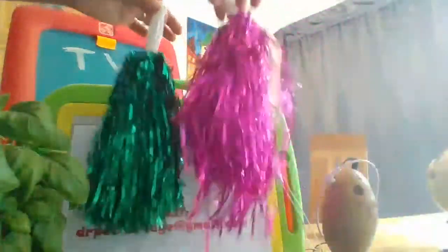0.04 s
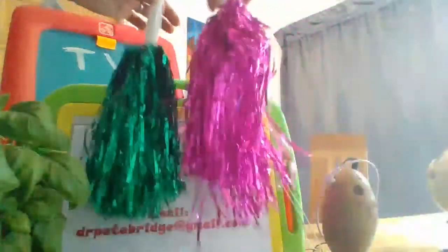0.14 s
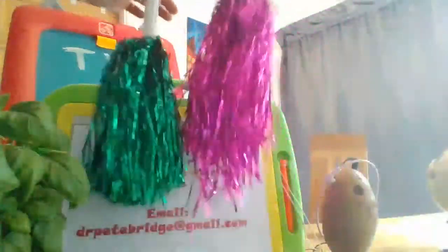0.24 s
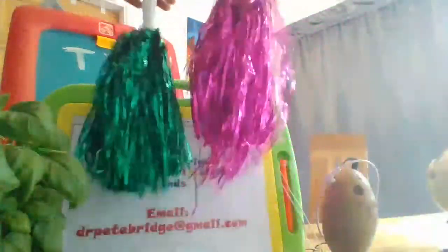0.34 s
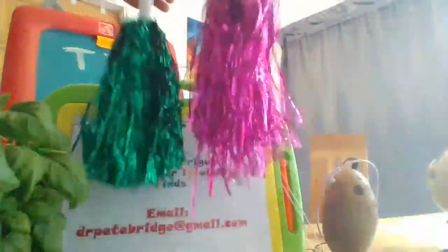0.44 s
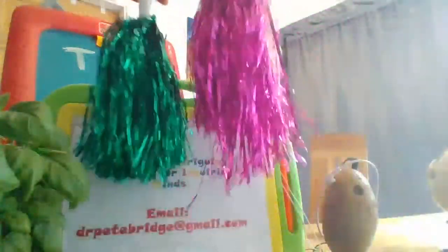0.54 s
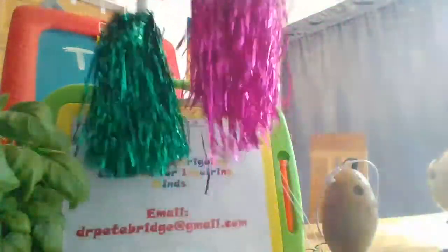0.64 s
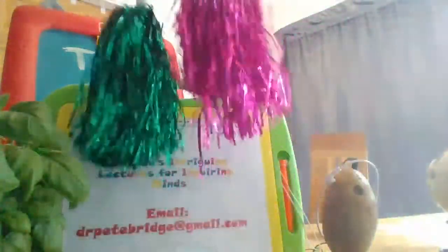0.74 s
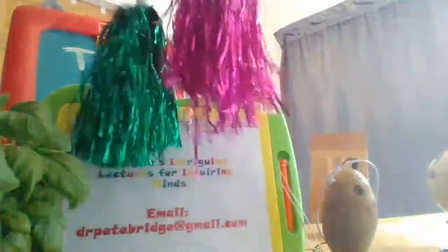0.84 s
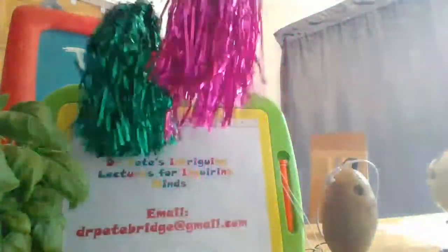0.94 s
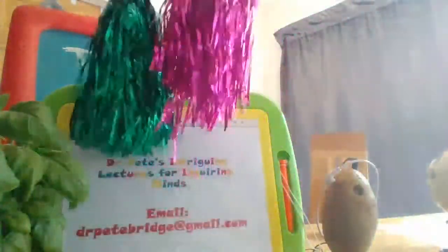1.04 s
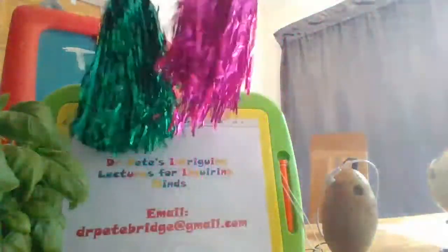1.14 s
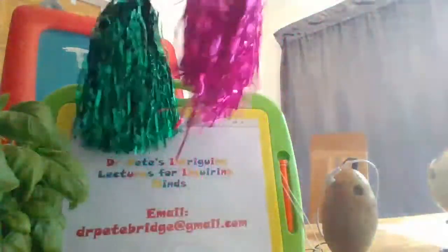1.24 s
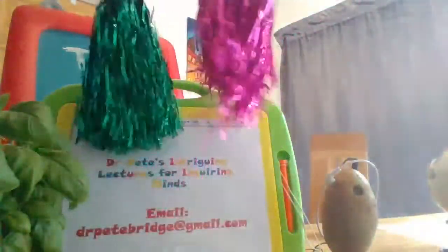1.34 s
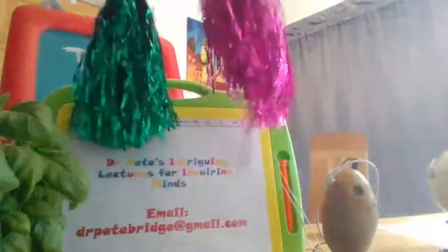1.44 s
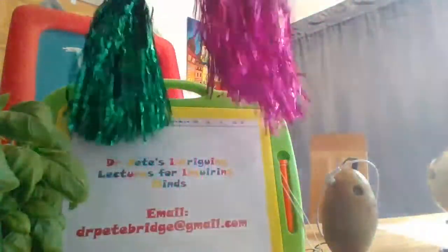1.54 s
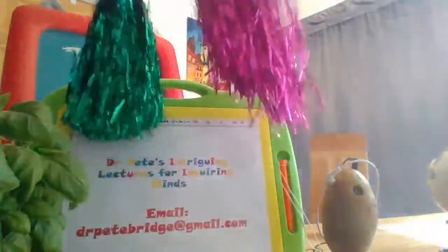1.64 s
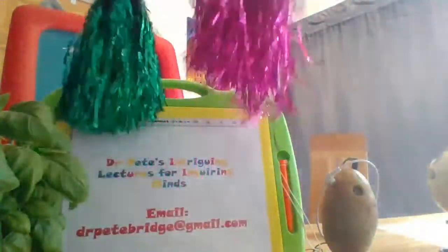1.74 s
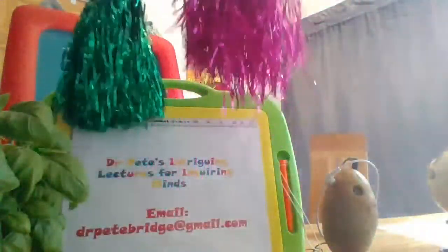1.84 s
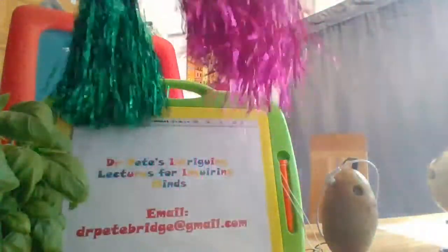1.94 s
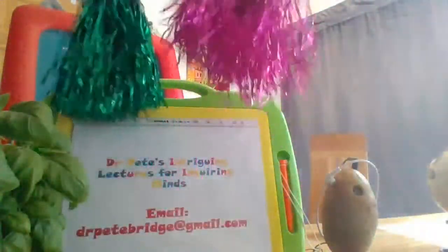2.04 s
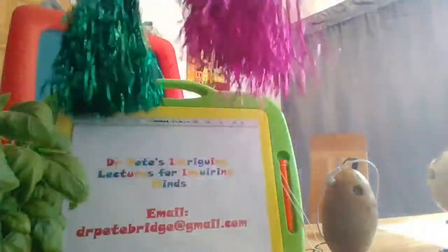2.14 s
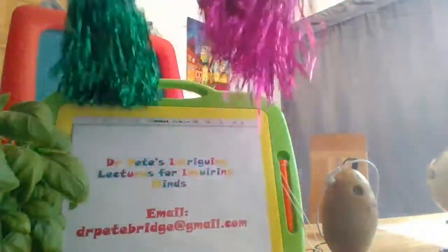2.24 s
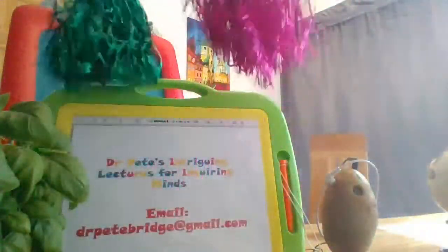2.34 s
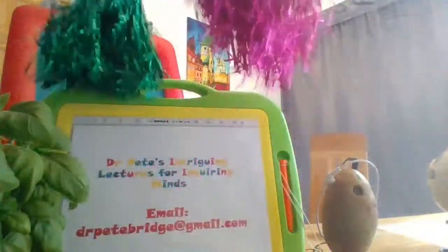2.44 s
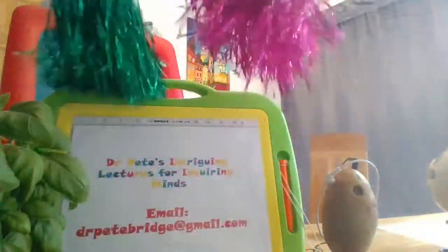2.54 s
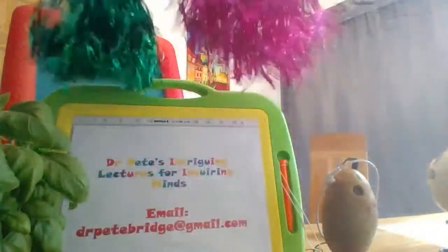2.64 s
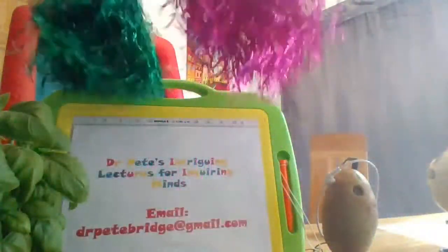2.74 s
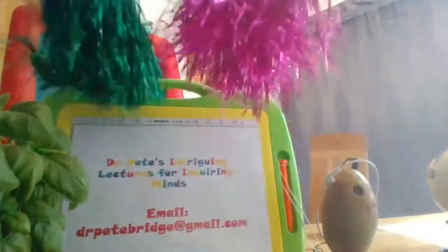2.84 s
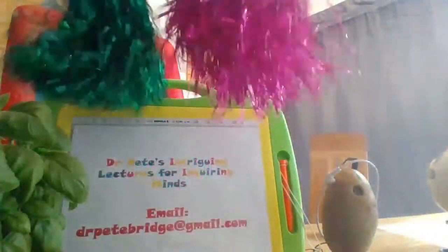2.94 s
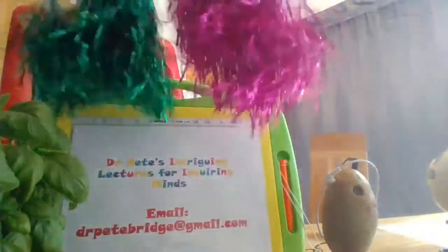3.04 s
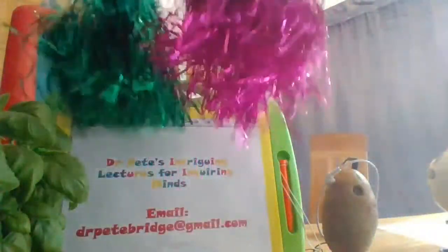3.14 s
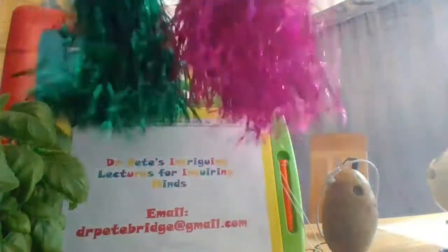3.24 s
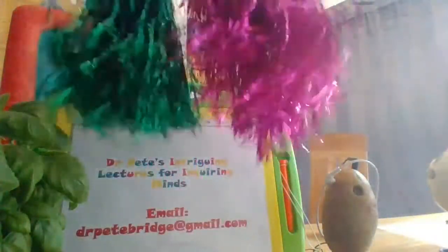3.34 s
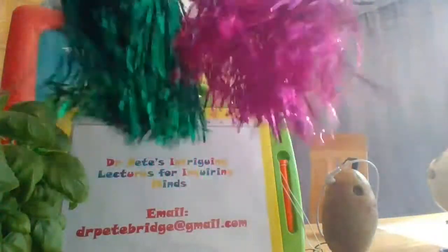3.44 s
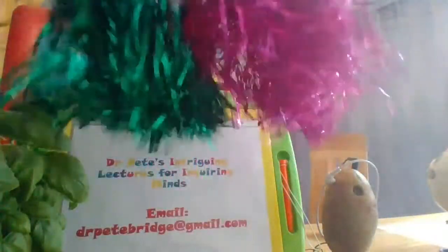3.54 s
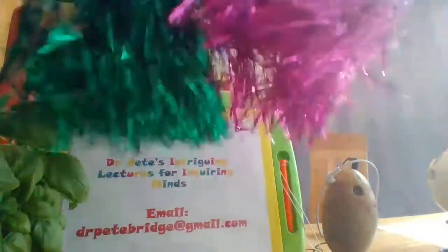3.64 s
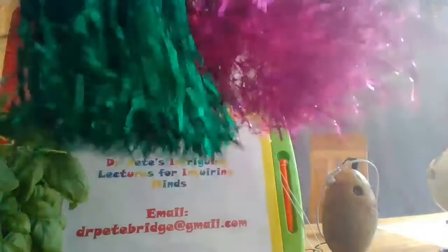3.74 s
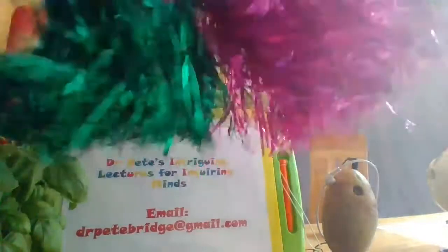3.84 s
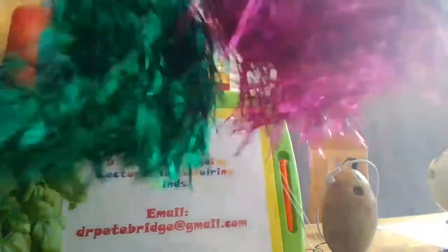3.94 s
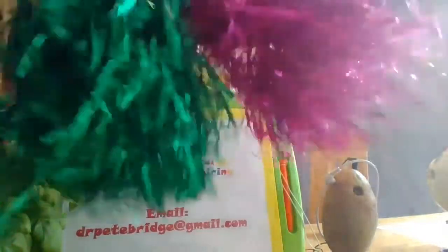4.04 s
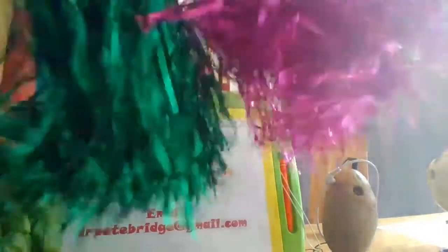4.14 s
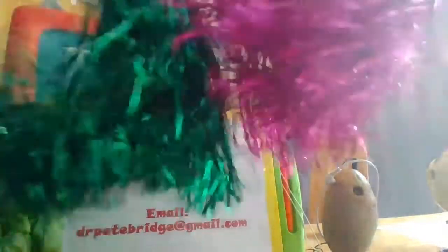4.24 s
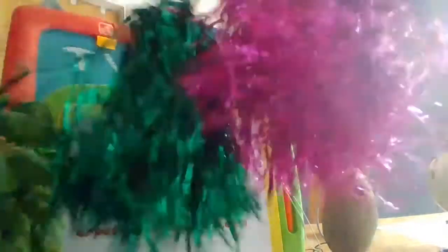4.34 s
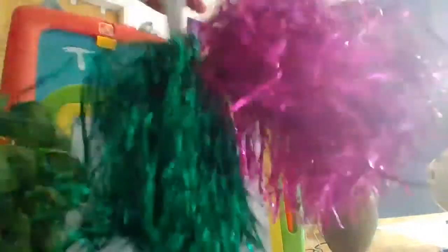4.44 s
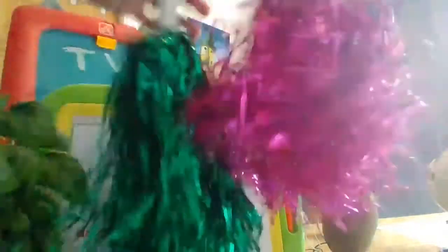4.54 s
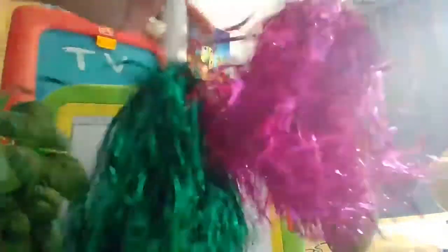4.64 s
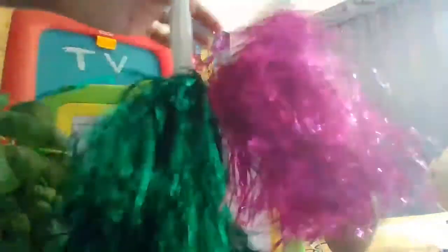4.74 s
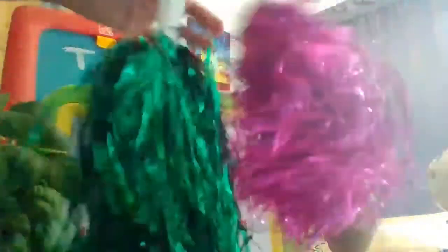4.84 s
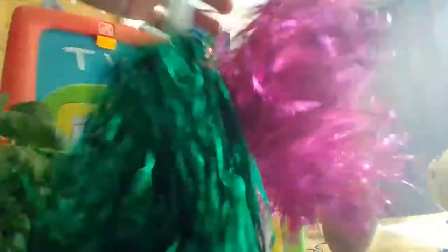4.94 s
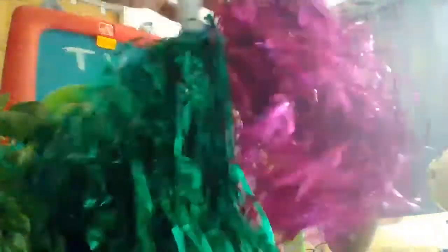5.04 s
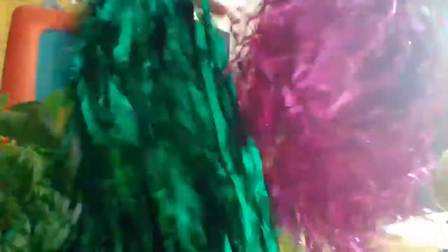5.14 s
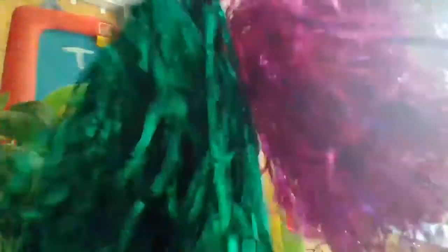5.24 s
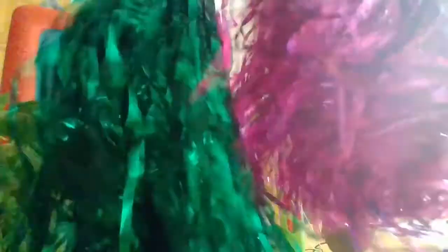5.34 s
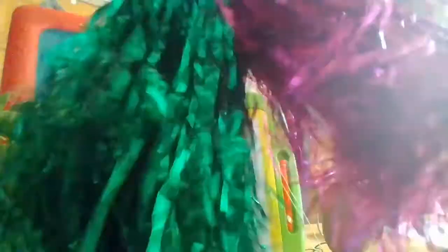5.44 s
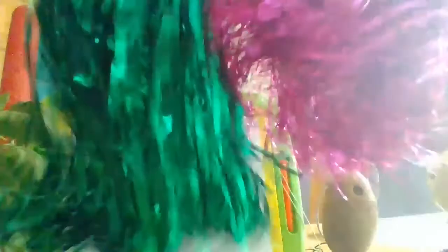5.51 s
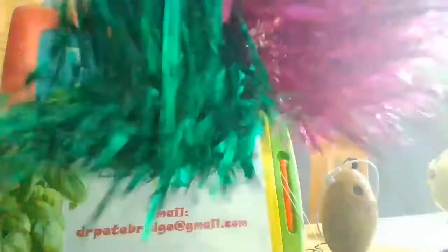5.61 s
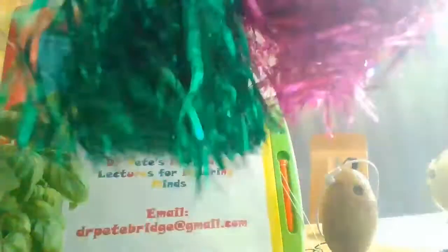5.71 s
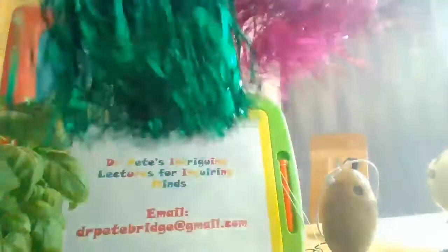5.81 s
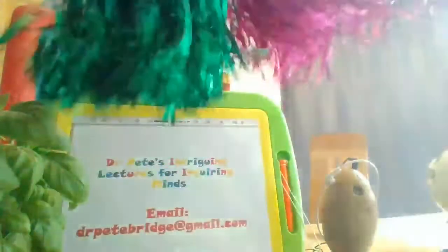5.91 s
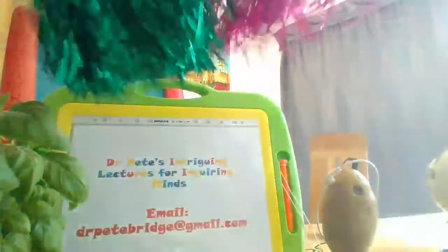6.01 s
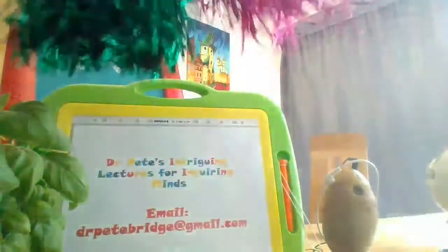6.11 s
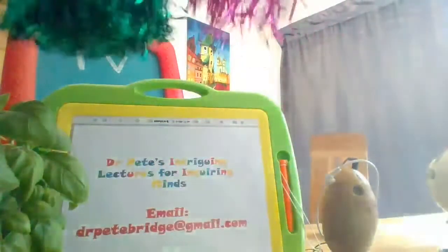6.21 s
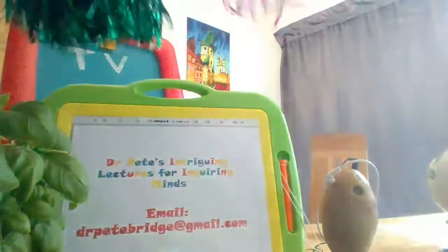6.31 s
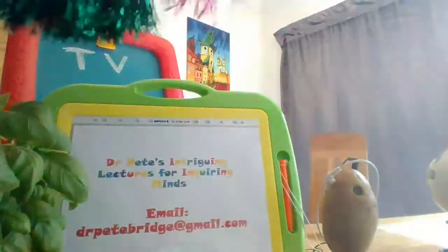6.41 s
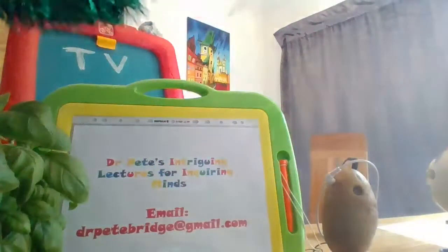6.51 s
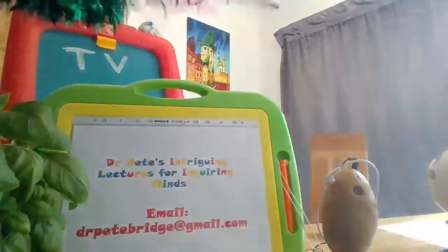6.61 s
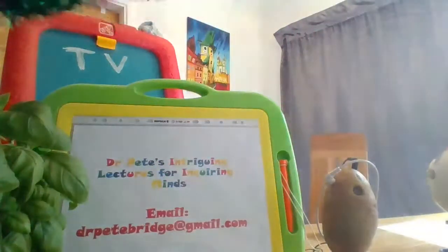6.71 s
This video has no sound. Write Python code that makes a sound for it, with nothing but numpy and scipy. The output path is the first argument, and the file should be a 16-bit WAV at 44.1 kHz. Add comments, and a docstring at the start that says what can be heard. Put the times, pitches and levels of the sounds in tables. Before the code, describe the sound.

Two foil tinsel pom-poms rustle briefly, sway softly, then are shaken hard in a dense crackling, hissing flurry before fading in a small room.

```python
"""Two foil tinsel pom-poms are lifted near a microphone in a small room: a brief loud rustle, then soft swaying.
They are then shaken harder and harder, and at last the rustle fades as they are drawn away.
Thousands of random snaps, coloured three ways, make flapping, crinkling and a fine hiss; the swaying is mostly hiss.
Gliding noise makes swishes, short noise bursts make ticks, wavering tones make soft bumps, and noise makes
a whoosh, a rumble and a faint room hum. Both channels carry the same sound."""
import sys
import numpy as np
from scipy import signal
from scipy.fft import rfft, irfft, next_fast_len
from scipy.io import wavfile
from scipy.ndimage import map_coordinates

SR = 44100
rng = np.random.default_rng(int(sys.argv[2]) if len(sys.argv) > 2 else 0)


def int16_out(signal):
    """Quantize to a 16-bit WAV file."""
    q = np.round(np.clip(np.atleast_2d(signal).T, -1, 1) * 32767)
    wavfile.write(sys.argv[1], SR, q.astype(np.int16))


N = 298557  # length in samples


# The colour of whole strips flapping dully. Each row: pitch in Hz, relative level in dB per Hz.
FLAP_COLOUR = [(170, -16), (250, -15.5), (350, -15), (550, -10.5), (720, -8.5), (950, -4), (1150, -2.5),
               (1480, -2), (1750, -8), (2000, -18)]
# The colour of the folds crinkling while the strips hang. Each row: pitch in Hz, relative level in dB per Hz.
CRINKLE_HANGING = [(1550, -12.5), (2100, -3), (2700, -7.5), (3300, -3), (3800, -7), (4500, -0.5),
                   (5300, 0.5), (6100, -3), (7000, -2.5), (7800, -7.5), (8600, -15)]
# The same while the strips whirl. Each row: pitch in Hz, relative level in dB per Hz.
CRINKLE_WHIRLING = [(1600, -11), (2200, -0.5), (3000, -3), (3700, -4), (4350, 0.5), (4900, -2),
                    (5650, -4.5), (6500, 0.5), (7050, 1), (7700, -4), (8600, -4)]
# The colour of the edges' fine hiss. Each row: pitch in Hz, relative level in dB per Hz.
BRUSH_COLOUR = [(7500, -14.5), (8150, -6), (9200, -2), (10600, -1.5), (11700, -0.6), (12900, -3),
                (15700, -4)]
# Extra level of the flapping within the rustle. Each row: time in seconds, level in dB.
FLAP_LEVEL = [(0.05, 0), (.5, -4.5), (.9, 1), (1.4, 1.5), (2.1, 0.9), (2.5, 6.5), (2.78, -2.5), (3.05, 1.5),
              (3.7, 0.2), (4.8, 1), (5.1, -2.5), (5.65, 4), (6.1, -1.2), (6.27, 0.5), (6.77, -1)]
# Whole strips swing over together; negative where they hang in the air. The whoosh swells with them too.
# Each row: middle in seconds, half-length in seconds, swell of the flapping in dB.
FLAPS = [(0.2, .04, -0.5), (0.34, .035, 2.5), (0.46, .025, 0.5), (0.65, .025, 2), (0.89, 0.031, 8),
         (1.62, .02, 2), (1.74, 0.023, 5), (1.87, 0.027, 7), (2.3, .03, 0.5), (2.37, .018, -5),
         (2.48, .025, -0.5), (2.54, 0.022, -3), (2.59, 0.036, 3), (2.88, 0.033, 4.5), (2.98, .05, 0),
         (3.19, 0.034, -1), (3.32, 0.022, -0.5), (3.49, 0.044, 0.5), (3.8, 0.025, 1), (3.9, 0.023, 0.5),
         (4.05, .025, 1.5), (4.13, .025, 0), (4.54, 0.03, 0.5), (4.67, 0.03, 3), (4.78, 0.02, 1.5),
         (4.92, 0.029, 2.5), (5.23, .025, 5), (5.42, .025, 1), (5.65, .035, 0.5), (5.78, .025, 1),
         (5.89, .02, 1.5), (6.13, 0.018, 2.5), (6.19, 0.023, -2), (6.25, 0.027, 7)]
# Strokes of the wrists, when the strips move fastest; negative where they go slack. Each row: middle in
# seconds, half-length in seconds, swell of the crinkling in dB, swell of the brushing in dB.
STROKES = [(0.15, 0.055, 3.5, 2), (0.35, 0.046, 4, 2), (0.512, 0.063, 2, 2), (0.67, 0.042, 4.5, 3.5),
           (0.799, 0.046, 3.5, 3.7), (0.926, 0.061, 8, 5), (1.063, 0.025, 0.5, 3), (1.2, 0.078, -0.5, 3),
           (1.377, 0.036, 3.9, 3), (1.757, 0.074, 4.5, 3.5), (1.897, 0.051, 7, 7.5), (1.957, 0.028, 5.5, 4),
           (2.11, 0.043, -1, 2.5), (2.175, 0.02, -2, -1.5), (2.265, 0.082, 2, 3), (2.458, 0.058, 1.9, 3.5),
           (2.572, 0.038, 2.8, 3.5), (2.67, 0.045, -0.5, 1.5), (2.865, 0.052, 1.5, 2),
           (3.035, 0.039, 1.5, 2.5), (3.135, 0.05, -3, 0.5), (3.2, 0.071, 4, 3), (3.286, 0.039, -2.0, -1),
           (3.336, 0.052, 2.5, 2.5), (3.53, 0.061, 1.5, 2), (3.617, 0.068, 2, 0.5), (3.754, 0.031, 2, 2.5),
           (3.903, 0.026, 2.5, 1.5), (4.064, 0.034, 1.5, 3), (4.173, 0.046, 2.5, 2), (4.32, 0.045, 2, 1),
           (4.492, 0.045, 3, 2), (4.638, 0.05, 3, 2), (4.77, 0.037, 0.5, 2), (4.956, 0.043, 3.5, 0.5),
           (5.178, 0.087, 2, 0), (5.497, 0.049, 3, 4), (5.665, 0.057, 3, 3), (5.79, 0.048, 2, 0.5),
           (6.007, 0.16, 0.2, 3), (6.13, 0.025, 0, 0.5), (6.24, 0.03, 1.5, 4), (6.417, 0.025, 2, 1.5)]
SQUEAK_DB = -14  # squeaks against the snaps of the folds, before the room


def pompoms():
    """Whole strips flap, their folds crinkle and squeak, and their edges brush in a fine hiss.
    All follow the effort and swell with the swings; flying strips flap and crinkle more and brush less."""
    force, flare = effort(), openness()
    crinkle_swell, brush_swell = swells(STROKES)

    # The first number is the level for hanging strips at a brisk shake, before any swell.
    flap_db = -56.3 + 0.89 * force + 5.9 * flare + swells(FLAPS)[0] + curves(FLAP_LEVEL)[0]
    crinkle_db = -47.7 + force + 2.0 * flare + crinkle_swell
    brush_db = -41.9 + force - 2.3 * flare + brush_swell

    flaps = shifting(snaps(rate=3000, spread_db=2), patch_db=2.5, width_hz=170.6, life=.035)
    flaps = room(flaps, echo_db=-11, wet_db=-7)
    flaps = peaked(coloured(flaps, FLAP_COLOUR))

    folds = shifting(snaps(rate=6000, spread_db=0.5), patch_db=1.78, width_hz=312.0, life=.03)
    folds = folds + amp(SQUEAK_DB) * squeaks()
    folds = room(folds, echo_db=-4.5, wet_db=-12)
    folds = flaring(folds, CRINKLE_HANGING, CRINKLE_WHIRLING)

    edges = shifting(snaps(rate=14000, spread_db=0.9), patch_db=0.65, width_hz=1240, life=0.043)
    edges = room(edges, echo_db=-9.5, wet_db=-18)
    edges = coloured(edges, BRUSH_COLOUR)
    return amp(flap_db) * flaps + amp(crinkle_db) * folds + amp(brush_db) * edges


# How hard and near the pom-poms are shaken. Each row: time in seconds, effort in dB.
EFFORT = [(0, -44.5), (0.08, -52), (0.55, -53.5), (0.76, -62.5), (1.08, -61), (1.16, -65), (1.3, -68),
          (1.6, -65.5), (1.82, -60.5), (2.18, -54), (2.24, -51), (2.95, -44.5), (3.3, -47), (3.7, -42),
          (4.4, -42.5), (4.8, -40.5), (5.08, -46), (5.33, -50.5), (5.75, -50.5), (6.2, -55.5), (6.5, -60.5),
          (6.77, -61.5)]
FULL_EFFORT_DB = -45  # a brisk shake


def effort():
    """The force of the shaking, in dB over a brisk shake."""
    return curves(EFFORT)[0] - FULL_EFFORT_DB


# How far the strips fly out. Each row: time in seconds, openness from 0 (hanging) to 1 (whirling close by).
FLARE = [(0, 0.23), (.5, 0.4), (1.1, 0.078), (2.6, 0.035), (3.0, 0.77), (3.4, 0.65), (3.7, 1), (4.8, 0.81),
         (5.7, 0.93), (6.1, 0.4), (6.77, 0.53)]


def openness():
    """How far the bunches have opened out at each sample."""
    return np.clip(curves(FLARE)[0], 0, 1)


def flaring(x, hanging, whirling):
    """The colour changes as the bunch opens out."""
    flare = openness()
    return (1 - flare) * coloured(x, hanging) + flare * coloured(x, whirling)


def snaps(rate, spread_db):
    """Tiny foil snaps of uneven strength at random moments, on average `rate` a second."""
    chance = rng.random(N)
    size = np.clip(rng.standard_normal(N), -3, 3)
    sign = rng.choice([-1, 1], N)
    return unit((chance < rate / SR) * sign * amp(spread_db * size))


def shifting(x, patch_db, width_hz, life):
    """Strips bend and turn, so patches of the spectrum, width_hz by life seconds, swell and sink."""
    hz, t, z = signal.stft(x, SR, nperseg=512)
    knots = rng.standard_normal((400, 800))
    grid = np.meshgrid(hz / width_hz, t / life, indexing="ij")
    field = map_coordinates(knots, grid, mode="wrap")  # smooth random hills and dips
    return signal.istft(z * amp(patch_db * field), nperseg=512)[1][:N]


# A broad peak in the flapping shifts as the pom-poms move.
# Each row: time in seconds, centre in Hz, height in dB.
FLAP_PEAK = [(0, 1420, 11), (.5, 1400, 1.5), (.9, 1330, 4), (1.6, 1260, 2.5), (1.9, 1210, 4.5),
             (2.55, 1170, 9), (3.0, 1300, 10), (3.3, 1270, 5), (3.69, 1470, 8), (4.3, 1490, 8),
             (4.7, 1480, 7), (5.0, 1410, 6.5), (5.3, 1510, 5.5), (5.7, 1370, 10.5), (5.95, 1220, 7.5),
             (6.3, 1250, 4), (6.77, 1320, 3)]


def peaked(x, half_width_octaves=0.41):
    """Boosts the moving peak of the flapping, at an even loudness."""
    hz, t, z = signal.stft(x, SR, nperseg=1024)
    s, *cols = np.transpose(FLAP_PEAK)
    centre, height = (np.interp(t, s, c) for c in cols)
    octaves_off = np.log2((hz[:, None] + 1) / centre)
    gain = amp(height * np.exp(-(octaves_off / half_width_octaves) ** 2))
    power = np.mean(np.abs(z) ** 2, axis=1) @ gain ** 2  # what the peak does to the loudness
    return unit(signal.istft(z * gain / np.sqrt(power), nperseg=1024)[1][:N])


SQUEAK_RATE, SQUEAK_HZ, SQUEAK_S = 110, 4795, 0.03  # how many a second, middle pitch, length in seconds


def squeaks(spread_db=5, octaves=.8, glide=0.044):
    """Single strips catch and slip: tiny chirps, each at its own gliding pitch, flicker within the crinkling."""
    place, pitch, size, bend = rng.random((int(SQUEAK_RATE * N / SR), 4)).T[:, :, None]
    n = int(SQUEAK_S * SR)
    u = np.arange(n) / n  # 0 to 1 through each chirp
    hz = SQUEAK_HZ * 2 ** (octaves * (2 * pitch - 1)) * (1 + glide * (2 * bend - 1) * u)
    swell = np.sin(np.pi * np.sqrt(u)) ** 2  # rises fast, falls slowly
    chirps = amp(spread_db * size) * swell * np.sin(2 * np.pi * np.cumsum(hz, axis=1) / SR)
    where = (place * N).astype(int) + np.arange(n)
    return unit(np.bincount(where.ravel(), chirps.ravel(), N)[:N])  # adds up overlapping chirps


# How long the room rings. Each row: pitch in Hz, time in seconds to fall by 60 dB.
ROOM_RING = [(150, 0.19), (1500, 0.082), (6000, 0.11), (15000, 0.039)]
# Change in the strength of the quick echoes as the pom-poms move. Each row: time in seconds, change in dB.
ECHO_LEVEL = [(0, -1), (.4, 4), (1.2, -6), (1.8, -2), (2.6, -6), (2.82, 2), (3.25, 6), (3.8, 1), (4.0, -3),
              (4.4, 1), (4.8, -3.5), (5.25, 3), (5.8, 3), (6.4, -3)]


def room(x, echo_db, wet_db, life=.14, count=4):
    """Quick echoes off the desk and boards comb the sound, with a short tail; the paths change every life seconds."""
    hop = int(np.clip(life, .05, .4) * SR)
    out, padded = np.zeros(N + 2 * SR), np.pad(x, (hop, 2 * hop))
    fade = np.sin(np.pi * np.arange(2 * hop) / (2 * hop))  # each stretch fades into the next
    echo = amp(echo_db + curves(ECHO_LEVEL)[0])
    starts = np.arange(0, N + hop, hop)

    # Tails are noise that dies away at the room's own speed for each pitch.
    hz, t, z = signal.stft(rng.standard_normal((140, SR // 6)), SR, nperseg=256)
    decay = amp(-60 * t / along(ROOM_RING, hz)[:, None])
    tails = signal.istft(z[:len(starts)] * decay, SR, nperseg=256)[1]

    delays = rng.triangular(.0009, .0019, .0075, (len(z), count))  # seconds
    signs = rng.choice([-1, 1], (len(z), count))
    for start, tail, delay, sign in zip(starts, tails, delays, signs):
        paths = amp(wet_db) * tail / np.linalg.norm(tail)
        paths[(delay * SR).astype(int)] += sign * echo[min(start, N - 1)] / np.sqrt(count)
        heard = signal.fftconvolve(padded[start:start + 2 * hop] * fade, paths)
        out[start:start + len(heard)] += heard
    return unit((x + out[hop:hop + N]) / np.sqrt(1 + echo ** 2 + amp(2 * wet_db)))


# The bunches push air when they whirl close by. Each row: time in seconds, level in dB before the swells.
WHOOSH_LEVEL = [(2.1, -88), (2.5, -72.5), (3.3, -82), (3.7, -64), (4.1, -70), (4.5, -71), (4.8, -70),
                (5.1, -90)]
# The colour of that air. Each row: pitch in Hz, relative level in dB per Hz.
WHOOSH_COLOUR = [(200, -8), (260, -0.5), (380, -1), (500, -5), (650, 3), (850, -4)]


def whoosh():
    """A dull rush of air, made of noise, gives the hardest shaking its body."""
    level_db = curves(WHOOSH_LEVEL)[0] + swells(FLAPS)[0]
    return amp(level_db) * coloured(rng.standard_normal(N), WHOOSH_COLOUR)


# Strips sliding along each other.
# Each row: start in seconds, length in seconds, level in dB before the fades, first Hz, last Hz.
SWISHES = [(0.111, 0.074, -58, 4600, 4940), (0.1, 0.2, -64, 2150, 2050), (0.212, 0.17, -65, 4800, 4950),
           (0.217, 0.32, -58.5, 7000, 7100), (0.424, 0.15, -58, 5120, 5200), (0.445, 0.17, -63, 2070, 2115),
           (0.856, 0.17, -65, 3260, 3270), (2.4, 0.035, -49.5, 4200, 4380),
           (2.478, 0.064, -52.5, 5000, 5600), (2.545, 0.049, -53, 5600, 4750),
           (2.572, 0.055, -48.5, 4700, 5530), (2.677, 0.033, -55, 1960, 2060),
           (2.701, 0.14, -55, 5240, 5250), (2.859, 0.044, -49.5, 3030, 2860),
           (2.895, 0.09, -53, 4700, 4700), (3.383, 0.052, -50, 4500, 4670), (3.968, 0.19, -49, 6040, 7030),
           (4.557, 0.32, -44, 7050, 6680), (5.202, .2, -58, 1620, 1715), (5.22, 0.13, -65, 6700, 6500),
           (5.649, 0.051, -55, 2025, 1970)]


def swishes(width=0.058):
    """One strip sliding over another gives a narrow, gliding hiss."""
    out = np.zeros(N)
    for s, length, db, first_hz, last_hz in SWISHES:
        n = int(length * SR)
        glide = np.exp(2j * np.pi * np.cumsum(np.linspace(first_hz, last_hz, n)) / SR)
        noise = rng.standard_normal(n) + 1j * rng.standard_normal(n)
        scrape = signal.lfilter(*signal.butter(2, width * first_hz, fs=SR), noise)
        hiss = unit((scrape * glide).real)  # the slow noise is carried up to the gliding pitch
        out[round(s * SR):][:n] += amp(db) * hiss * np.sin(np.pi * np.arange(n) / n)
    return out


# Single strips whipping against something hard. Each row: start in seconds, peak in dB.
TICKS = [(3.497, -35), (4.622, -36), (6.59, -47)]


def ticks(t60=0.0018):
    """A whipped strip gives one tiny sharp snap: noise that falls by 60 dB in t60 seconds."""
    out, t = np.zeros(N), np.arange(SR // 100) / SR
    for s, db in TICKS:
        snap = rng.standard_normal(len(t)) * amp(-60 * t / t60)
        out[round(s * SR):][:len(t)] += amp(db) * snap / np.abs(snap).max()
    return out


# Soft bumps of the shaking. Each row: peak time in seconds, peak in dB, pitch in Hz, half-length in seconds.
BUMPS = [(0.615, -66, 126, .03), (1.79, -70, 72, 0.027), (1.92, -61, 131, 0.026), (2.05, -64, 143, 0.021),
         (2.19, -68, 68, .05), (2.32, -60, 137, 0.029), (2.41, -66, 72, .028), (2.5, -58, 128, 0.037),
         (2.64, -69, 119, .025), (2.82, -57, 152, 0.038), (2.83, -65, 236, 0.035), (3.11, -57.5, 69, 0.033),
         (3.2, -64, 118, .025), (3.3, -57.5, 129, 0.064), (3.31, -69, 70, .03), (3.42, -64, 128, 0.04),
         (3.435, -64, 72, .022), (3.648, -67, 241, 0.085), (3.68, -57, 127, 0.05), (3.9, -61, 128, 0.041),
         (4.08, -57, 118, 0.015), (4.21, -53, 67, .03), (4.27, -58.5, 137, 0.025), (4.32, -56, 71, 0.02),
         (4.385, -65, 68, 0.026), (4.64, -65, 136, 0.02), (4.78, -65, 129, 0.03), (4.87, -67, 72, 0.017),
         (5.78, -70, 72, .025)]


def bumps(waver=0.78, waver_rate=45):
    """Each jolt swells softly into a low boom of unsteady pitch and dies."""
    out, t = np.zeros(N), np.arange(-SR // 4, SR // 4) / SR
    for s, db, hz, length in BUMPS:
        drift = map_coordinates(rng.standard_normal(100), [(t - t[0]) * waver_rate], mode="wrap")
        boom = np.sin(2 * np.pi * (hz * t + rng.random()) + waver * drift)
        out[round((s + t[0]) * SR):][:len(t)] += amp(db) * np.exp(-(t / length) ** 2) * boom
    return out


# The rumble of the moving arms. Each row: time in seconds, level in dB.
RUMBLE_LEVEL = [(0, -77.5), (.6, -76), (.8, -80), (1.65, -83), (1.9, -74.5), (2.7, -71), (3.3, -68.5),
                (3.8, -68), (4.4, -70.5), (4.9, -74), (5.3, -76.5), (5.85, -73.5), (6.3, -78), (6.77, -86)]


def handling():
    """A low rumble of movement, made of deep noise, runs under the bumps."""
    colour = [(55, -19), (70, 0.0), (100, -0.5), (130, 7.0),  # (Hz, relative dB per Hz)
              (175, -5.5), (240, -6.0), (330, -15.5), (450, -9)]
    return amp(curves(RUMBLE_LEVEL)[0]) * coloured(rng.standard_normal(N), colour)


# The colour of the quiet room. Each row: pitch in Hz, relative level in dB per Hz.
HUM_COLOUR = [(22, 12), (42, -2), (62, -7), (90, -7.5), (125, -8), (180, -5), (245, -1), (320, -3.5),
              (420, -7.5), (600, -20), (1200, -12), (2500, -8.5), (5000, -9.5), (8000, -18), (15000, -23)]


def room_hum():
    """The quiet room's faint hum and hiss is steady coloured noise."""
    return amp(-74.0) * coloured(rng.standard_normal(N), HUM_COLOUR)


def amp(db):
    """Decibels to gain."""
    return 10 ** (np.asarray(db) / 20)


def unit(x):
    """x scaled to an average (rms) level of 1."""
    return x / np.sqrt(np.mean(x ** 2) + 1e-20)


def along(points, hz):
    """Reads between (Hz, value) points on a log pitch axis."""
    f, v = np.transpose(points)
    return np.interp(np.log(hz + 1), np.log(f + 1), v)


def curves(rows):
    """One value per sample for each column after the time."""
    s, *cols = np.transpose(rows)
    return [np.interp(np.arange(N) / SR, s, c) for c in cols]


def swells(rows):
    """Every swing swells and settles in the same way: one dB curve for each column after the length."""
    s, length, *heights = np.transpose(rows)
    t = np.arange(0, N, 100) / SR
    shape = np.exp(-((t - s[:, None]) / length[:, None]) ** 2)
    return curves(np.column_stack([t, *(np.array(heights) @ shape)]))


def filtered(x, response):
    """x with each pitch scaled by response(hz)."""
    m = next_fast_len(N + SR // 2)
    return irfft(rfft(x, m) * response(np.fft.rfftfreq(m, 1 / SR)), m)[..., :N]


def coloured(x, spectrum):
    """x shaped by the given spectrum, falling steeply beyond its ends, at rms 1."""
    lo, hi = spectrum[0][0], spectrum[-1][0]

    def response(hz):
        skirts = np.minimum(hz / lo, 1) ** 4 / np.maximum(hz / hi, 1) ** 8
        return amp(along(spectrum, hz)) * skirts

    return unit(filtered(x, response))


def scene():
    """Pom-poms, bumps and the quiet room, the same in both channels."""
    sound = pompoms() + whoosh() + swishes() + ticks() + bumps() + handling() + room_hum()
    return np.array([sound, sound])


LOW_CUT_HZ, TOP_HZ = 55, 15750  # the small microphone weakens the bass below the first; the second is the band limit


def record(dry):
    """The microphone weakens the deep bass, and nothing is kept above the band limit."""
    return filtered(dry, lambda hz: (hz < TOP_HZ) * np.clip(hz / LOW_CUT_HZ, .6, 1) ** 4)


dry = scene()
out = record(dry)
int16_out(out)
```